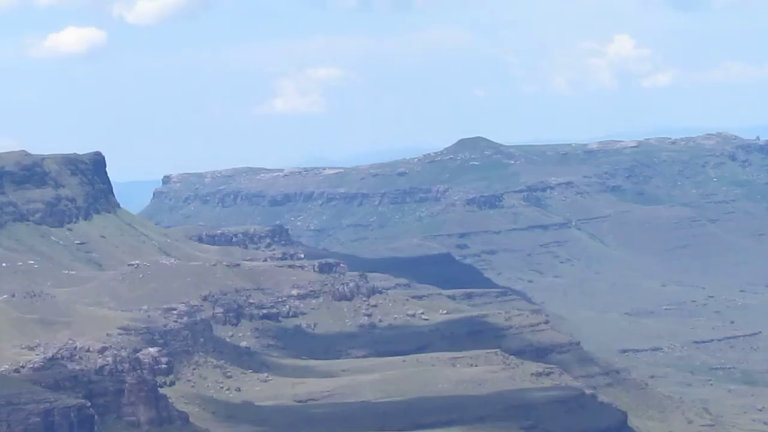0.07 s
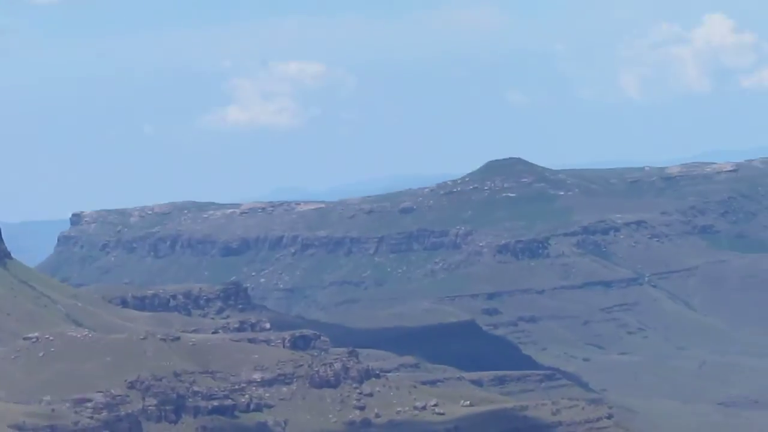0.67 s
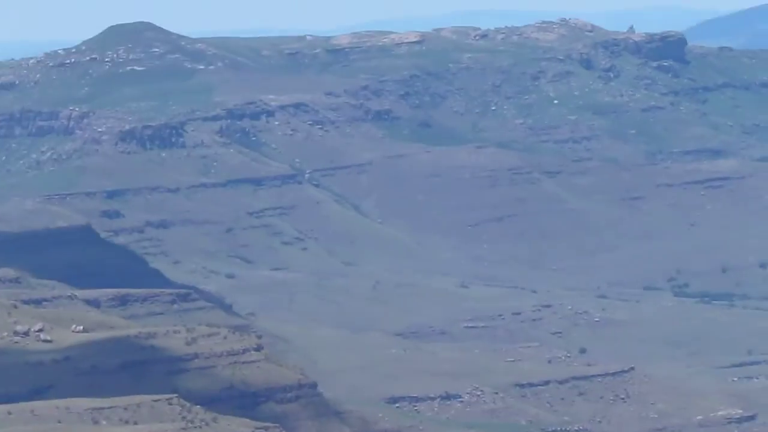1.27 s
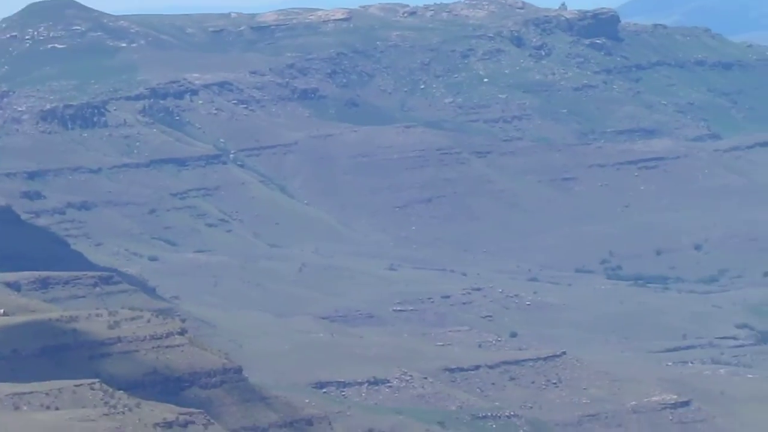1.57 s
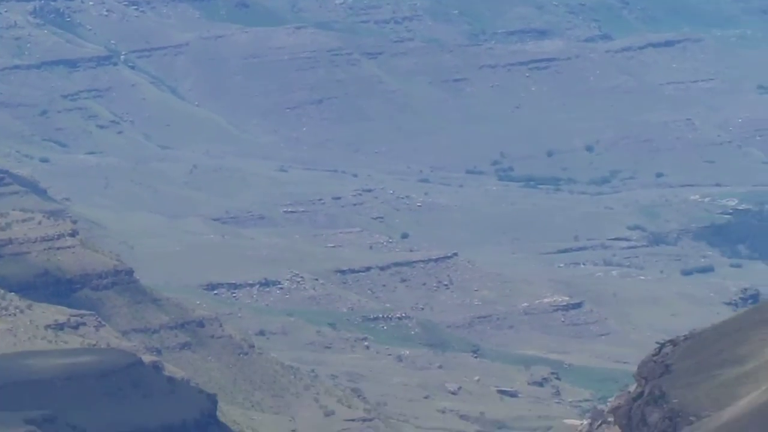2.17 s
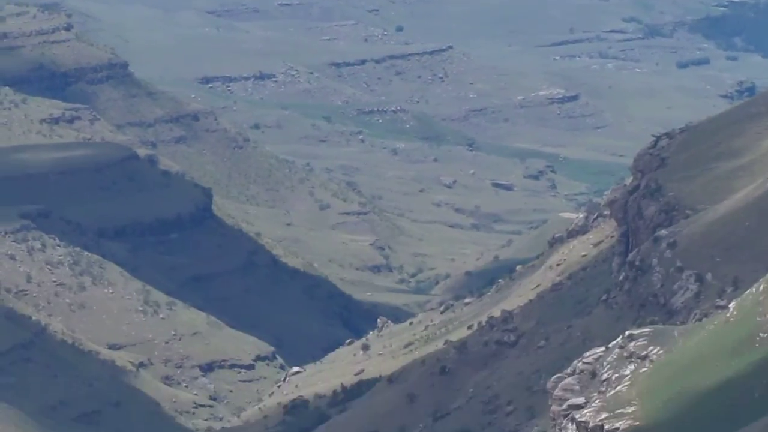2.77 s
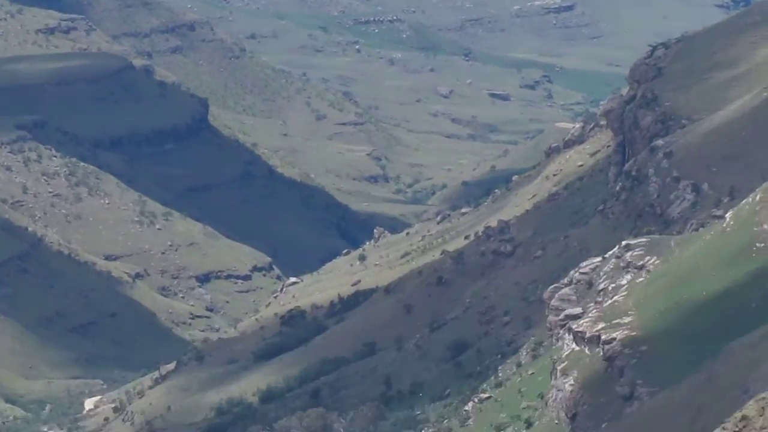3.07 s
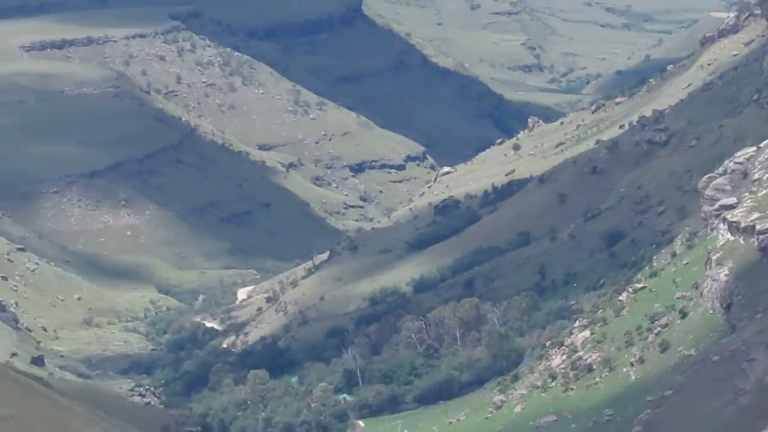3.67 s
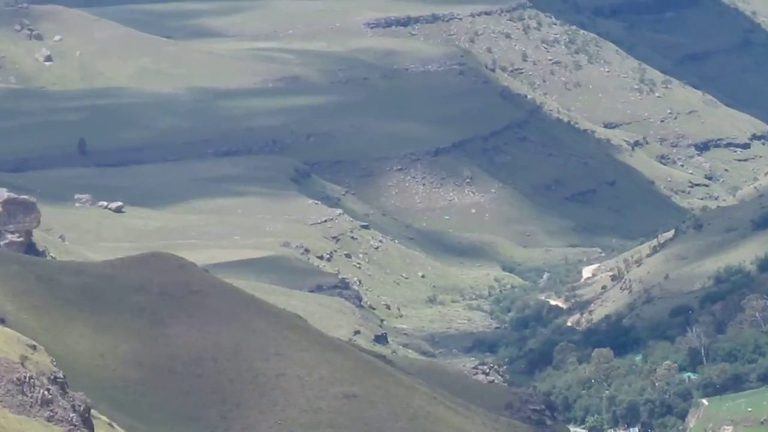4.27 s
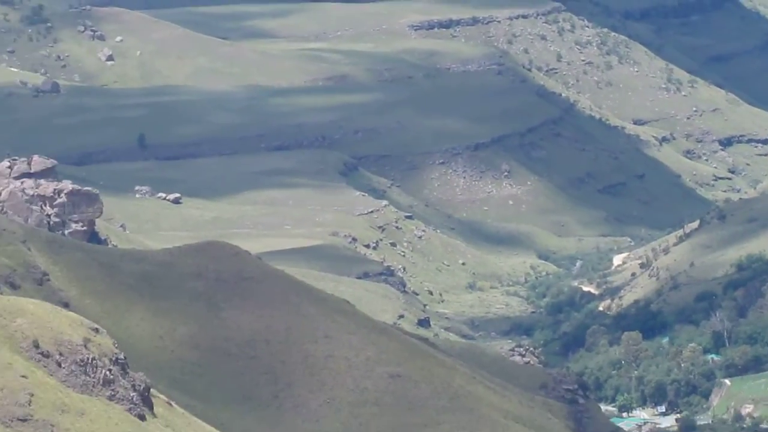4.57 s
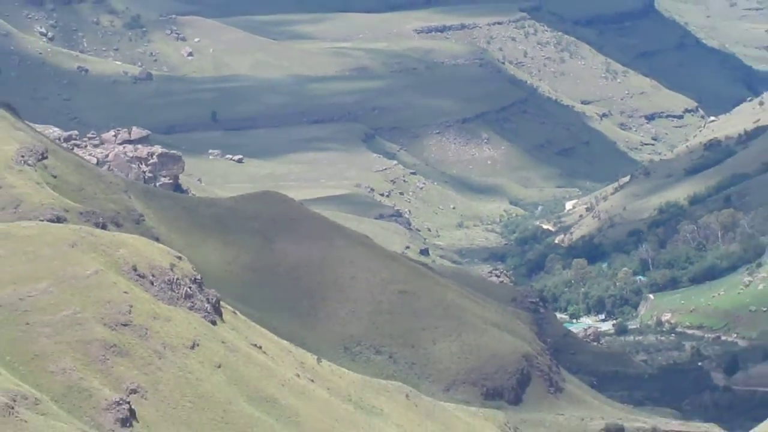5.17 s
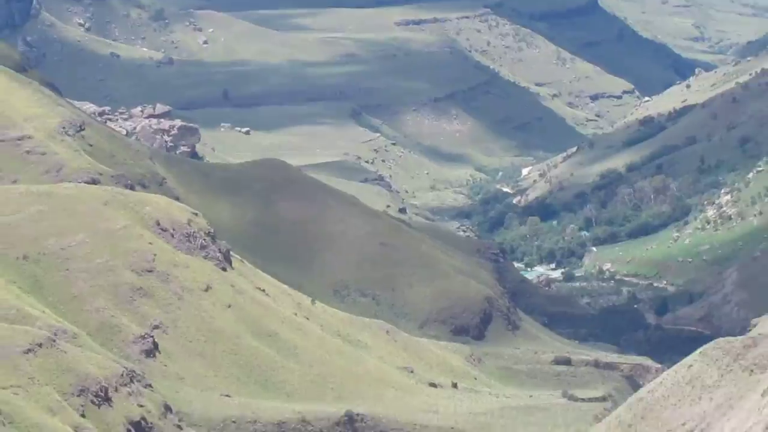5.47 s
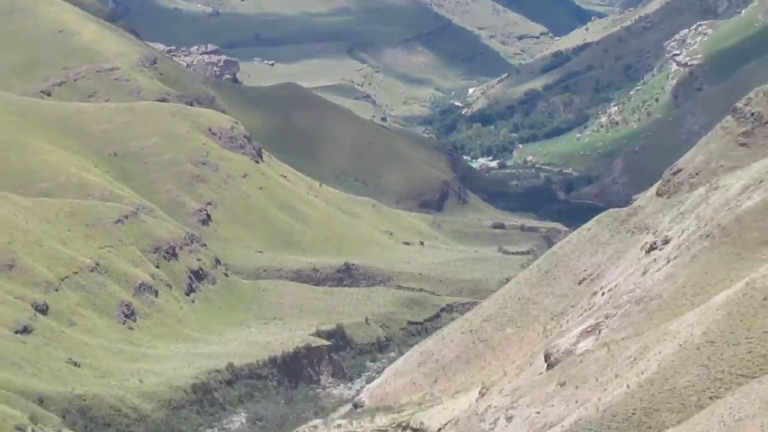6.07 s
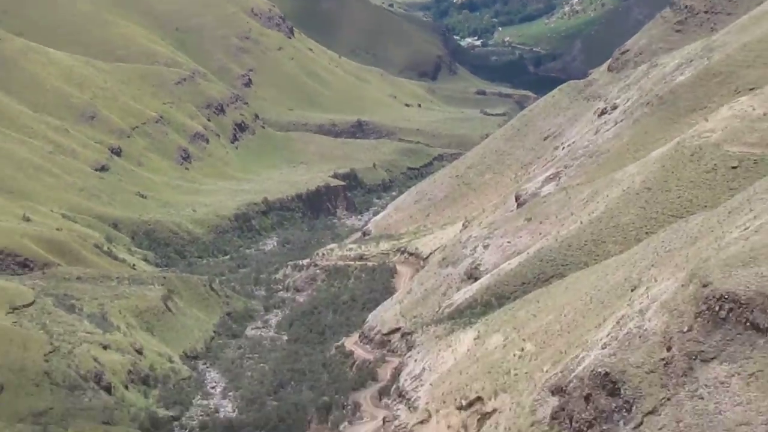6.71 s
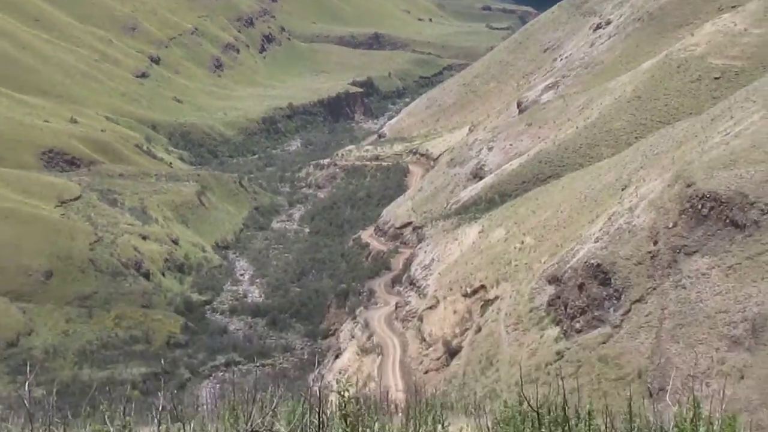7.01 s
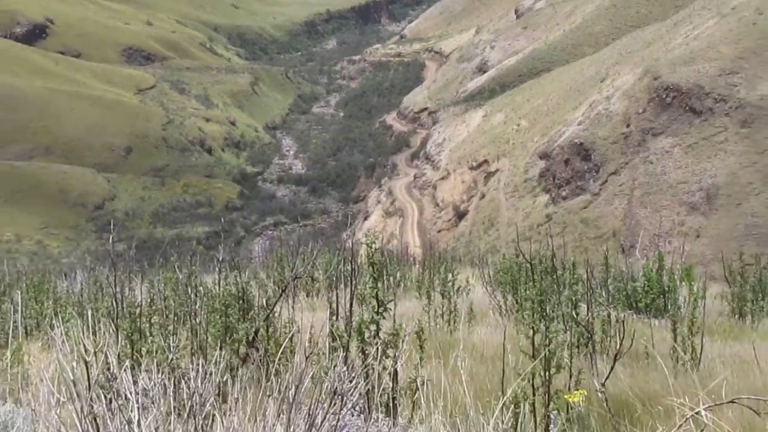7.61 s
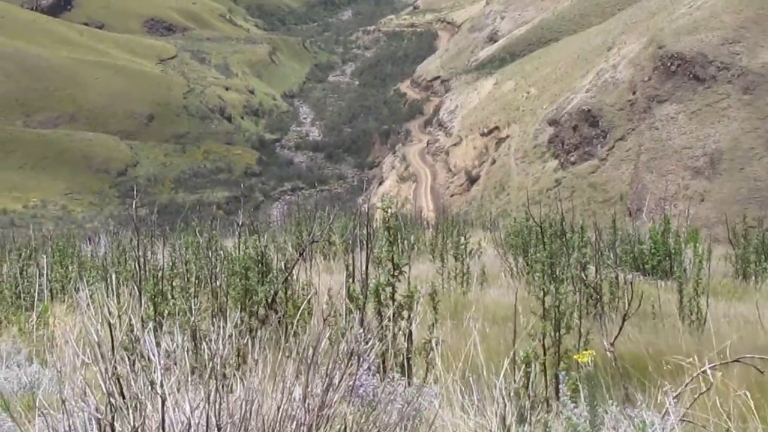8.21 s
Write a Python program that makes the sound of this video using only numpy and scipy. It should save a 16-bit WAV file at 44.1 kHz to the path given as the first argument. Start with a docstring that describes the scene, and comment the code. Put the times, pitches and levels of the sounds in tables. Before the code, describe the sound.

Gusty mountain wind buffets the microphone with uneven rumble, thumps and crackles, over a faint airy hiss and a sharp click.

```python
"""Gusty mountain wind buffets the two microphone ports of a hand-held camera, the right one harder.
Large whirls rumble at each port on its own; in strong gusts small eddies tear across it and single
ones thump, pop or spit; the strongest gusts crackle and rasp. A sharp bright tick sounds as the
hardest thump overloads the microphone. Behind it: far wind, a fine hiss that sinks and swells,
a faint bird, and a click, light knocks and rubs on the camera body."""
import sys
import numpy as np
from scipy import signal
from scipy.fft import rfft, irfft, next_fast_len
from scipy.io import wavfile
from scipy.ndimage import uniform_filter1d, minimum_filter1d, map_coordinates

SR = 44100
rng = np.random.default_rng(int(sys.argv[2]) if len(sys.argv) > 2 else 0)


def store_pcm(level_fs):
    """Save levels as 16-bit WAV."""
    pcm = np.round(np.clip(level_fs, -1, 1) * 32767).astype(np.int16)
    wavfile.write(sys.argv[1], SR, np.atleast_2d(pcm).T)


N = 372644

# Spectra of bright and dull noise for clicks and rubs. Each row: frequency in Hz, density in dB.
BRIGHT_SPECTRUM = [(1000, -3.5), (3000, 0.5), (4600, 3), (6000, -5.5), (8500, 2), (12000, -0.5),
                   (13500, -4), (15500, -8.5)]
DULL_SPECTRUM = [(500, -28.5), (800, -2), (1200, 3), (1750, -1), (2100, -5), (4200, -23), (7000, -42.5)]
# Flow under the gusts. Each row: time in seconds, left port in dB, right port in dB, turbulence in dB.
STEADY_FLOW = [(0, -29, -21.5, 2.5), (.45, -22.5, -19, 4.5), (.8, -21.5, -18, 2), (1.05, -23.5, -17.5, 2.5),
               (1.3, -26, -19, 6.5), (1.6, -25, -19.5, 3.5), (2.1, -28.5, -16.5, 5), (2.42, -24, -17.5, 1),
               (2.62, -29, -24, 0.5), (3.05, -34, -23, 1), (3.8, -33, -22, -1.5), (4.6, -33, -28.5, 1),
               (5.3, -37, -25, -3), (5.6, -19, -17.5, -2.5), (6.4, -30, -25, -2.5),
               (6.8, -27.5, -29.5, -0.5), (7.4, -23, -21, -2), (8.1, -18.5, -26, -2),
               (8.45, -26, -22, -1.5)]


def amp(db):
    """Decibels to gain."""
    return 10 ** (np.asarray(db) / 20)


def unit(x):
    """Scale to rms 1."""
    return x / np.sqrt(np.mean(x ** 2) + 1e-20)


def along(points, hz):
    """Interpolate (Hz, value) points on a log frequency axis."""
    knots_hz, values = np.transpose(points)
    return np.interp(np.log(hz + 1), np.log(knots_hz + 1), values)


def curves(rows):
    """One value per sample for each column after the time."""
    times_s, *columns = np.transpose(rows)
    return [np.interp(np.arange(N) / SR, times_s, column) for column in columns]


def wobble(rate_hz):
    """Smooth random curve, rate_hz knots a second."""
    knots = rng.standard_normal(int(N * rate_hz / SR) + 4)
    return map_coordinates(knots, [np.arange(N) * rate_hz / SR])


def filtered(x, response):
    """Apply a complex frequency response."""
    size = next_fast_len(N + SR // 2)
    return irfft(rfft(x, size) * response(np.fft.rfftfreq(size, 1 / SR)), size)[..., :N]


def noise(spectrum):
    """Coloured noise of rms 1."""
    return unit(filtered(rng.standard_normal(N), lambda hz: amp(along(spectrum, hz))))


def steadied(x, window_s):
    """Hold the running rms near 1."""
    power = signal.fftconvolve(x ** 2, signal.windows.hann(int(window_s * SR)), 'same')
    return unit(x / np.sqrt(np.abs(power) + 1e-4 * power.mean()))


def add(track, start_s, sound):
    """Mix a sound into a track."""
    part = track[round(start_s * SR):][:len(sound)]
    part += sound[:len(part)]


def air(lag_ms=0.036, drift_db=1.5, low_hz=8000, top_hz=13000):
    """Far wind and a fine hiss whose colour drifts, reaching the right port a little sooner."""
    # Each row: time in seconds, far wind in dB, hiss in dB, lift of the top treble in dB.
    levels = [(0, -62, -66, 0.5), (1.35, -64, -75, 0), (1.45, -71, -86.5, -1.5), (4.4, -61.5, -75.5, -1),
              (4.44, -62, -67, 1.5), (4.78, -60, -66.5, 3.5), (4.82, -59.5, -62.5, 3.5),
              (5.42, -55, -59, 2), (5.44, -59.5, -64, 1.5), (5.66, -60, -60.5, 3), (6.2, -57.5, -58, 1.5),
              (6.24, -59, -61.5, 2.5), (7.2, -55.5, -59, 2.5), (7.75, -52.5, -57, 0),
              (7.79, -52, -65, -1.5), (8.2, -55, -64, -1.5), (8.33, -52.5, -50.5, 2.5),
              (8.45, -49.5, -50, 2)]
    # Each row: frequency in Hz, density in dB.
    far_spectrum = [(100, -5), (400, -2), (1000, -1.5), (1450, -4), (1800, -6), (2300, -9.5), (3100, -13),
                    (3700, -18.5), (5500, -24), (9000, -37.5)]
    hiss_spectrum = [(1500, -16.5), (3000, -1.5), (4200, -2), (5400, -4), (6700, 1), (7500, 0), (9000, 2),
                     (10500, 0), (12100, 5), (13000, -4), (14300, -0.5), (15700, -12)]
    # Each row: frequency in Hz, left-right correlation.
    likeness = [(300, 0.33), (1500, 0.18), (4000, 0.28), (12000, 0.42)]

    def mid_side_gains(hz):
        angle = np.arccos(np.clip(along(likeness, hz), -1, 1)) / 2
        return np.array([np.cos(angle), np.sin(angle)])

    def stereo_noise(spectrum):
        mid, side = filtered(np.array([noise(spectrum), noise(spectrum)]), mid_side_gains)
        return amp(0.75 * wobble(7.2)) * np.array([mid + side, mid - side])

    far_db, hiss_db, top_db = curves(levels)
    hiss = stereo_noise(hiss_spectrum)
    top = filtered(hiss, lambda hz: 1 - 1 / (1 + (hz / top_hz) ** 20))
    low = filtered(hiss, lambda hz: 1 / (1 + (hz / low_hz) ** 10))
    hiss = hiss + (amp(top_db) - 1) * top + (amp(drift_db * wobble(5)) - 1) * low
    out = amp(far_db) * stereo_noise(far_spectrum) + amp(hiss_db) * hiss
    delay_s = np.array([[0.5], [-0.5]]) * lag_ms / 1000
    return amp([[-1.5], [0]]) * filtered(out, lambda hz: np.exp(-2j * np.pi * hz * delay_s))


def bird(trill_s=6.482, first_hz=4320, floor_hz=3130, note_s=0.028, gap_s=0.0025):
    """A far bird: one slur, then a trill that falls, levels off and fades; every note slides down."""
    # Each note: start in seconds, pitch in Hz, level in dB, length in seconds, slide as share of pitch.
    slur = (6.285, 4500, -60, 0.038, 0.22)
    trill = [(trill_s + k * (note_s + gap_s), floor_hz + (first_hz - floor_hz) * 0.72 ** k,
              -59 - k, note_s, 0.12) for k in range(6)]
    out = np.zeros(N)
    waver = 1 + 0.022 * wobble(450)
    for start_s, start_hz, db, length_s, slide in [slur] + trill:
        hz = start_hz * (1 - slide * np.linspace(0, 1, int(length_s * SR)) ** 1.8)
        hz = hz * waver[round(start_s * SR):][:len(hz)]
        add(out, start_s, amp(db) * np.hanning(len(hz)) * np.sin(2 * np.pi * np.cumsum(hz) / SR))
    return out


def hand_rubs(grain_db=3):
    """Short grainy rubs of the hand on the camera body."""
    # Each row: start in seconds, length in seconds, scrape in dB, body in dB.
    rubs = [(3.544, 0.044, -78, -66.5), (3.623, .1, -72, -68.5), (7.893, 0.051, -54, -44)]
    out = np.zeros((2, N))
    for track in out:
        scrape = unit(noise(BRIGHT_SPECTRUM) * amp(grain_db * wobble(300)))
        body = noise(DULL_SPECTRUM)
        for start_s, length_s, scrape_db, body_db in rubs:
            now = round(start_s * SR) + np.arange(int(length_s * SR))
            rub = amp(scrape_db) * scrape[now] + amp(body_db) * body[now]
            add(track, start_s, np.hanning(len(now)) * rub)
    return out


def clicks(rise_s=0.00018, chatter_db=-10, chatter_t60_s=0.04):
    """Each click is a bright noise burst over a dry knock: a brief ring with a little chatter."""
    # Each row: start in seconds, burst in dB, burst T60 in seconds, knock in dB.
    # At 5.427 s, a sharp bright tick as the hard wind thump overloads the microphone;
    # the other rows are touches on the camera's plastic shell.
    events = [(2.868, -65.5, .025, -70.5), (5.427, -46, 0.013, -62), (7.606, -39, .025, -42),
              (7.611, -33.5, 0.014, -50), (7.6141, -23.5, .014, -41), (7.6166, -42.5, .018, -13.5),
              (7.76, -47.5, 0.037, -39.5), (8.106, -51.5, .023, -38.5), (8.157, -55.5, 0.033, -41.5),
              (8.21, -45, 0.03, -48)]
    # Each row: frequency in Hz, level in dB, T60 in seconds.
    ring_modes = [(870, -20.5, .02), (1210, -5, 0.011), (1430, -2, 0.015), (1635, 1, 0.014),
                  (2270, -4, .008), (2710, -11, 0.013), (3480, -10.5, 0.013), (4330, -20, 0.015)]
    out = np.zeros((2, N))
    t = np.arange(SR // 8) / SR
    onset = 1 - np.exp(-t / rise_s)
    for track, side_db in zip(out, (-3, 2)):
        bright, chatter = noise(BRIGHT_SPECTRUM), noise(DULL_SPECTRUM)
        for start_s, burst_db, burst_t60_s, knock_db in events:
            now = round(start_s * SR) + np.arange(len(t))
            ring = sum(amp(db + rng.normal(0, 1.3) - 60 * t / t60_s) * np.sin(2 * np.pi * hz * t)
                       for hz, db, t60_s in ring_modes)
            knock = ring + amp(chatter_db - 60 * t / chatter_t60_s) * chatter[now]
            burst = amp(-60 * t / burst_t60_s) * bright[now]
            add(track, start_s, onset * (amp(knock_db) * knock + amp(burst_db + side_db) * burst))
    return out


def flow_level(side, rise_10db_s=0.017, fall_10db_s=0.024):
    """Flow in dB at one port: gusts rise, hold and fall over a steady flow that drops in the lulls."""
    # Each row: start in seconds, hold in seconds, left port in dB, right port in dB.
    gusts = [(0.026, 0.027, -28.5, -15.5), (0.09, 0.11, -22.5, -14), (0.256, 0.053, -26.5, -14.5),
             (0.332, 0.06, -26.5, -11.5), (0.51, 0.045, -20, -17), (.572, .055, -17, -29),
             (.875, .015, -19, -26.5), (0.91, 0.025, -29.5, -17), (1.102, .012, -17, -22),
             (1.156, 0.16, -27, -13.5), (1.359, 0.077, -28, -15), (1.472, 0.018, -30.5, -19.5),
             (1.783, 0.015, -25, -17.5), (2.322, 0.082, -23.5, -18), (2.525, 0.039, -29.5, -22.5),
             (2.624, 0.015, -31.5, -26.5), (2.733, 0.097, -32, -26), (3.231, 0.016, -32.5, -21.5),
             (3.341, 0.043, -32.5, -18), (3.46, 0.053, -32, -22), (3.573, 0.017, -31, -26.5),
             (3.659, 0.04, -22, -20.5), (3.744, 0.025, -23.5, -19.5), (3.987, 0.1, -26, -15),
             (4.128, 0.14, -23.5, -16.5), (4.312, 0.087, -23, -12.5), (4.541, 0.018, -32.5, -21),
             (4.901, 0.022, -31.5, -19.5), (5.009, 0.06, -27, -16.5), (5.085, .045, -28, -18.5),
             (5.2, 0.036, -31.5, -18.5), (5.433, 0.099, -25, -14.5), (5.6, 0.12, -25, -17.5),
             (5.92, 0.022, -20.5, -13), (6.015, 0.015, -22, -17), (6.113, 0.025, -26.5, -20.5),
             (6.185, .06, -26, -20), (6.276, 0.041, -27, -15.5), (6.35, .11, -27.5, -15.5),
             (6.481, .06, -26, -14), (6.655, 0.033, -14, -19), (6.963, 0.065, -30.5, -25),
             (7.033, 0.035, -18.5, -25), (7.214, 0.06, -21.5, -18.5), (7.613, 0.048, -26, -18.5),
             (7.991, 0.014, -14.5, -14.5), (8.056, .02, -15, -21), (8.107, 0.017, -19, -21),
             (8.201, 0.086, -24, -22)]
    # Each row: centre in seconds, depth in dB (negative swells), half width in seconds.
    lulls = [(0.441, 0.5, 0.025), (.61, 5, 0.027), (0.681, 5, 0.017), (.772, 2.5, .012), (.962, 4.5, .014),
             (1.524, 4.5, 0.014), (1.562, 4.5, .012), (1.909, 5, 0.016), (2.412, 4, .01),
             (2.602, 14, 0.025), (2.672, 3.5, 0.012), (3.62, 6.5, 0.011), (3.72, 11, 0.0067),
             (3.919, 12.5, 0.02), (4.639, 9.5, 0.037), (4.77, 4, 0.016), (4.825, 3.5, .014),
             (5.17, 13, .011), (5.31, 11.5, 0.047), (5.99, 10.5, 0.0095), (6.085, 10, 0.028),
             (6.6, -6, 0.029), (6.75, 7.5, 0.014), (6.91, 9, 0.016), (7.131, 7, 0.028), (7.3, 1, 0.016),
             (7.556, 10, .025), (8.34, 6.5, 0.033)]
    t = np.arange(N) / SR
    dip_db = sum(db * np.exp(-((t - centre_s) / half_s) ** 2) for centre_s, db, half_s in lulls)
    power = amp(curves(STEADY_FLOW)[side] - dip_db) ** 2
    age_s = np.arange(-SR // 4, SR // 2) / SR
    for start_s, hold_s, *port_db in gusts:
        skirts = np.maximum(-age_s / rise_10db_s, 0) + np.maximum((age_s - hold_s) / fall_10db_s, 0)
        gust_power = amp(port_db[side] - 10 * skirts) ** 2
        add(power, max(start_s + age_s[0], 0), gust_power[start_s + age_s >= 0])
    return 10 * np.log10(power)


def eddy_level(level_db, turbulence_db, growth=1.776, knee_db=-16, knee_width_db=6.5, ceiling_db=-23.5):
    """Small eddies in dB: they outgrow the rumble up to a ceiling, sooner in turbulent air."""
    shortfall_db = growth * (knee_db - level_db) - turbulence_db
    return ceiling_db - knee_width_db * np.logaddexp(0, shortfall_db / knee_width_db)


def swirl(u, skew_rad):
    """Pressure under a passing vortex, u in half widths: a suction core with shoulders."""
    return -np.real(np.exp(1j * skew_rad) / (1 + 1j * u) ** 2)


def vortices(at, gain, half_samples, skew_rad):
    """Sum of vortices passing at the given samples."""
    k = np.arange(-200, 201)
    pulses = gain[:, None] * swirl(k / half_samples[:, None], skew_rad[:, None]) * np.hanning(len(k))
    return np.bincount(((at[:, None] + k) % N).ravel(), pulses.ravel(), N)


def rasp(eddy_db, flurry_db, full_db=-39.5, growth=4.6, grain_db=6):
    """In a full gust the finest turbulence merges into a continuous tearing rasp."""
    # Each row: frequency in Hz, density in dB.
    spectrum = [(300, -30), (1000, -6), (2000, 0), (3000, -3), (4000, -10), (5000, -22), (7000, -35),
                (10000, -50), (15000, -64)]
    level_db = full_db + growth * np.minimum(eddy_db + 20.5, 0)
    return amp(level_db) * unit(noise(spectrum) * amp(0.46 * flurry_db + grain_db * wobble(350)))


def crackle(eddy_db, rate_hz=910, max_db=-21.5, growth=3.2, min_half_ms=0.082):
    """Only the hardest gusts tear into tiny sharp vortices."""
    when, weakness, span, turn = rng.random((int(rate_hz * N / SR), 4)).T
    at = (when * N).astype(int)
    level_db = max_db + growth * np.minimum(eddy_db[at] + 19, 0) - 26 * np.sqrt(weakness)
    half_samples = min_half_ms * SR / 1000 * 2.1 ** span
    heard = level_db > -75
    return vortices(at[heard], amp(level_db[heard]), half_samples[heard], 2 * np.pi * turn[heard])


def thumps(eddy_db, rate_hz=5.4, max_over_db=14.0, base_half_ms=0.77, sharpening=0.2):
    """Stray soft vortices stand out of the stream; faster flow makes them narrower."""
    when, weakness, turn = rng.random((int(rate_hz * N / SR), 3)).T
    at = (when * N).astype(int)
    half_samples = base_half_ms * SR / 1000 * amp(-sharpening * (eddy_db[at] + 31.5))
    return vortices(at, amp(eddy_db[at] + max_over_db - 4.1 * weakness), half_samples, 2 * np.pi * turn)


def eddy_stream(flow_db, base_half_ms, crowding=0.5, sharpening=0.3, scatter=0.25, spread_db=2.5):
    """Small vortices, rms 1; faster flow sweeps more past, each one quicker and so brighter."""
    # Each row: frequency in Hz, gain of the port in dB.
    port_response = [(60, -57.5), (150, -19.5), (260, -3), (400, -3), (600, -2), (1000, -4), (1700, -0.5),
                     (2800, 2.5), (4200, 2.5), (6300, -5), (9000, -13.5)]
    step = 10  # samples
    chance, turn = rng.random((2, N // step))
    size, span = rng.standard_normal((2, N // step))
    rate_hz = 110 + 380 * amp(crowding * flow_db[::step][:len(chance)])
    hit = np.flatnonzero(chance < rate_hz * step / SR)
    bulk = np.exp(scatter * span[hit])  # wider vortices carry more pressure
    half_samples = base_half_ms * SR / 1000 * amp(-sharpening * flow_db[hit * step]) * bulk
    stream = vortices(hit * step, amp(spread_db * size[hit]) * bulk, half_samples, 2 * np.pi * turn[hit])
    return steadied(filtered(stream, lambda hz: amp(along(port_response, hz))), 0.092)


def hard_eddies(wake_ms=2.54, wake_db=-8, shatter_half_ms=0.13, spray_ms=0.98):
    """Single hard vortices with short wakes: wide ones thump, narrow ones pop, the narrowest spit."""
    # Each row: time in seconds, level in dB, core half width in ms, port (0 left, 1 right).
    hits = [(.033, -10, 0.33, 1), (.092, -11, 0.23, 1), (.117, -17, 0.2, 1), (0.172, -17.5, 0.21, 1),
            (.196, -14, 0.39, 1), (.258, -9, 0.28, 1), (.353, -20, 0.12, 1), (0.359, -25, .055, 1),
            (.382, -25, 0.075, 1), (0.4, -13, 0.135, 1), (.455, -22.5, 0.11, 1), (.527, -14, .23, 1),
            (0.542, -13, 0.19, 1), (.549, -17, 0.2, 1), (.655, -21, 0.26, 1), (.727, -15, 0.17, 1),
            (.815, -15.5, .25, 1), (.824, -17.5, 0.26, 1), (.885, -26, 0.21, 1), (.917, -12, 0.27, 1),
            (.928, -18, 0.23, 1), (.975, -21, .21, 1), (.994, -9, 0.55, 1), (1.032, -19, 0.19, 1),
            (1.053, -21, .23, 1), (1.099, -9, 0.42, 0), (1.127, -17.5, .23, 1), (1.152, -16, .25, 1),
            (1.166, -26, .09, 1), (1.168, -2.5, 0.24, 1), (1.172, -20, 0.07, 1), (1.187, -14, .27, 1),
            (1.22, -23, 0.072, 1), (1.224, -25, 0.029, 0), (1.226, -21, .05, 1), (1.227, -19.5, 0.03, 0),
            (1.23, -13, .22, 1), (1.258, -17, 0.15, 1), (1.266, -14, 0.18, 1), (1.273, -24, .075, 1),
            (1.278, -10, .22, 1), (1.297, -28, .07, 1), (1.321, -30, 0.07, 1), (1.36, -13.5, .28, 1),
            (1.368, -23, 0.13, 1), (1.388, -14, 0.17, 1), (1.43, -25.5, 0.061, 1), (1.481, -21, .18, 1),
            (1.6, -26, 0.3, 1), (1.652, -26, 0.25, 1), (1.718, -15.5, 0.21, 1), (1.744, -19, 0.2, 1),
            (1.811, -31.5, 0.056, 1), (1.93, -25, 0.21, 1), (1.956, -33, 0.1, 1), (2.026, -16, 0.24, 1),
            (2.106, -17, 0.24, 1), (2.182, -25, .2, 1), (2.194, -15.5, 0.22, 1), (2.345, -10.5, 0.27, 1),
            (2.381, -17, 0.19, 1), (2.451, -19.5, 0.31, 1), (2.71, -15, 0.64, 1), (3.154, -22, 0.39, 1),
            (3.379, -12, 0.38, 1), (3.468, -9, 0.86, 1), (3.663, -12.5, 0.59, 1), (3.692, -9.5, 0.62, 1),
            (4.027, -8, 0.36, 1), (4.079, -12, 0.3, 1), (4.188, -12.5, 0.34, 1), (4.544, -21, 0.37, 1),
            (4.556, -19, 0.34, 1), (4.902, -14, 0.83, 1), (5.05, -17, .48, 1), (5.063, -15, .55, 1),
            (5.194, -14, .7, 1), (5.212, -12.5, 0.53, 1), (5.427, -6.5, 0.27, 1), (5.428, 3.5, 1, 1),
            (5.471, -17.5, .27, 1), (5.48, -19, 0.37, 1), (5.593, -11, 0.38, 1), (5.637, -11, 0.48, 1),
            (5.713, -12, .7, 1), (5.9, -25, 0.61, 1), (5.919, -13.5, 0.55, 1), (5.94, -10, 0.7, 1),
            (6.04, -22.5, 0.49, 1), (6.295, -16, 0.53, 1), (6.314, -12, 0.6, 1), (6.385, -12, 0.42, 1),
            (6.453, -17, 0.45, 1), (6.483, -11.5, 0.57, 1), (6.514, -14, 0.41, 1), (6.539, -10, 0.67, 1),
            (7.988, -8.5, 0.55, 1), (8.001, -6, 1.2, 0), (8.114, -1, 0.8, 0), (8.118, -4, 1.1, 0),
            (8.132, -16, 0.52, 1), (8.262, -15, 0.72, 1)]
    out = np.zeros((2, N))
    ms = np.arange(-SR // 100, SR // 100) * 1000 / SR
    for time_s, db, half_ms, side in hits:
        core = 1.26 * swirl(ms / half_ms, 0.61)
        outer_whirl = 0.3 * swirl(ms / half_ms / 3.3, -0.27)
        wake = sum(swirl((ms - wake_ms * late) / half_ms, 2 * np.pi * turn)
                   for late, turn in rng.random((3, 2)))
        whole = core + outer_whirl + amp(wake_db) * wake
        shreds = rng.standard_normal(len(ms)) * np.exp(-np.abs(ms) / spray_ms)
        spray = signal.fftconvolve(whole, shreds / np.linalg.norm(shreds), 'same')
        spray_share = 1 / (1 + (half_ms / shatter_half_ms) ** 4)
        pressure = np.sqrt(1 - spray_share) * whole + np.sqrt(spray_share) * spray
        add(out[int(side)], time_s + ms[0] / 1000, amp(db) * pressure * np.hanning(len(ms)))
    return out


def rumble(level_db, turbulence_db, breakup_db, flurry_db, lift_per_db):
    """Big slow whirls; calmer flow leaves only the deepest part."""
    # Each row: frequency in Hz, density in dB.
    spectrum = [(10, -31), (25, -16), (45, -6), (70, -2), (110, -1.5), (170, -3), (250, -6), (350, -11),
                (500, -19.5), (800, -39), (1500, -51), (4000, -110)]
    full = noise(spectrum)
    deep = unit(filtered(full, lambda hz: 1 / np.sqrt(1 + (hz / 180) ** 6)))
    share = np.clip(0.73 + lift_per_db * (breakup_db + flurry_db), 0, 1.2)
    whirls = steadied((share * full + (1 - share) * deep) * amp(0.81 * flurry_db), 0.094)
    # The largest whirls follow gusts sluggishly; turbulent air carries fewer.
    largest = filtered(whirls, lambda hz: 1 / (1 + (hz / 65) ** 4))
    largest_db = uniform_filter1d(level_db, size=5000) - 0.25 * turbulence_db + 0.5
    return amp(level_db) * (whirls - largest) + amp(largest_db) * largest


def port_wind(side, shelter_db, rumble_db, tear_db, base_half_ms,
              lift_per_db, flutter_db, grit, unrest_db, rough_share):
    """Wind on one port: rumble, with small eddies on top in quick flurries."""
    level_db = flow_level(side) + unrest_db * wobble(16)
    turbulence_db = curves(STEADY_FLOW)[2]
    eddy_db = eddy_level(level_db - shelter_db, turbulence_db) + rough_share * turbulence_db
    breakup_db = np.clip(eddy_db - level_db + 13, -15, 8)  # how far the flow has split into eddies
    # Moderate flow grips and lets go; a full gust tears more evenly.
    fitfulness = np.interp(eddy_db, [-33, -25], [1, 0.55])
    flurry_db = flutter_db * fitfulness * (0.96 * wobble(42) + 0.6 * wobble(120))
    low = amp(rumble_db) * rumble(level_db, turbulence_db, breakup_db, flurry_db, lift_per_db)
    flow_db = eddy_db + 29.5 + 0.5 * flurry_db + grit * breakup_db
    flurries = eddy_stream(flow_db, base_half_ms) * amp(1.23 * flurry_db)
    tear = amp(eddy_db + tear_db) * steadied(flurries, 0.077)
    return low + tear + crackle(eddy_db) + thumps(eddy_db) + rasp(eddy_db, flurry_db)


def wind():
    """Both ports feel the same gusts but unrelated eddies; the left is more sheltered."""
    left = port_wind(0, shelter_db=2.04, rumble_db=0.0, tear_db=0.5, base_half_ms=0.77,
                     lift_per_db=0.055, flutter_db=4.0, grit=0.84, unrest_db=2.0, rough_share=0.54)
    right = port_wind(1, shelter_db=0.2, rumble_db=-0.76, tear_db=-0.52, base_half_ms=0.58,
                      lift_per_db=0.053, flutter_db=4.5, grit=0.82, unrest_db=1.0, rough_share=0.5)
    return np.array([left, right])


def scene():
    """Wind on the ports over a quiet hillside."""
    return wind() + hard_eddies() + air() + clicks() + hand_rubs() + bird()


def record(dry):
    """The camera's limiter ducks peaks over full scale; nothing passes above its band limit."""
    band_limit_hz = 15700
    needed_gain = 1 / np.maximum(np.abs(dry), 1)
    gain = uniform_filter1d(minimum_filter1d(needed_gain, size=301), size=301)
    return filtered(dry * gain, lambda hz: hz < band_limit_hz)


dry = scene()
out = record(dry)
store_pcm(out)
```